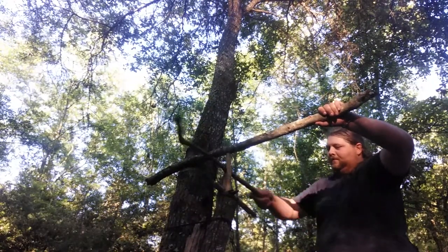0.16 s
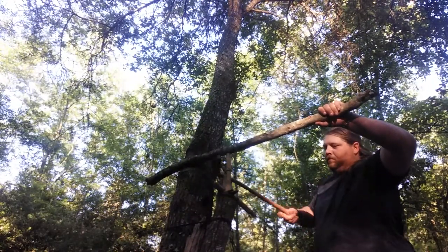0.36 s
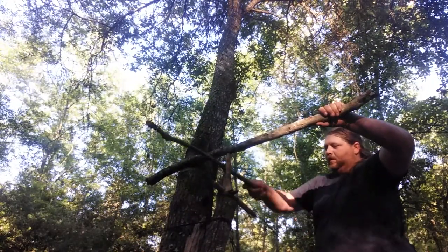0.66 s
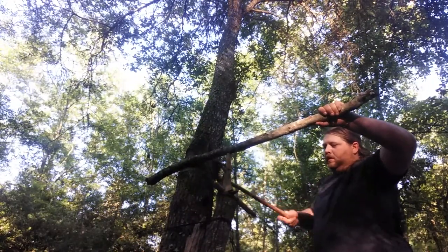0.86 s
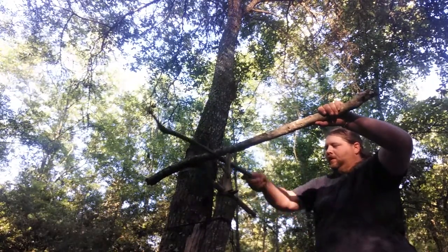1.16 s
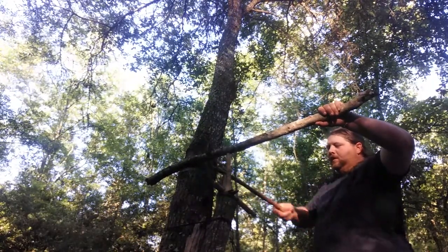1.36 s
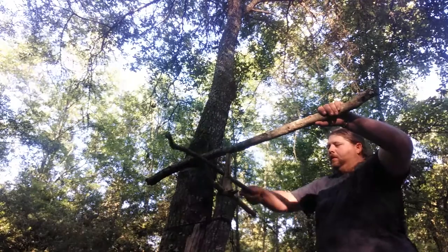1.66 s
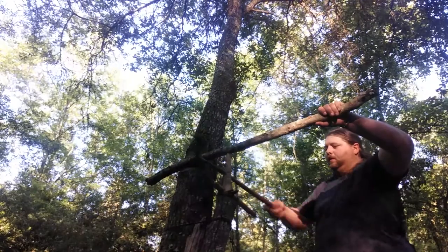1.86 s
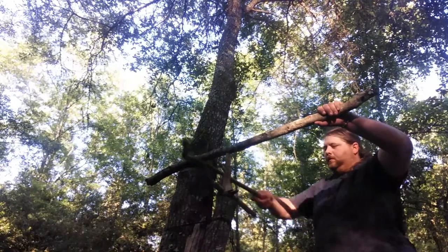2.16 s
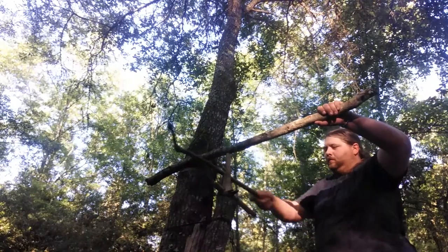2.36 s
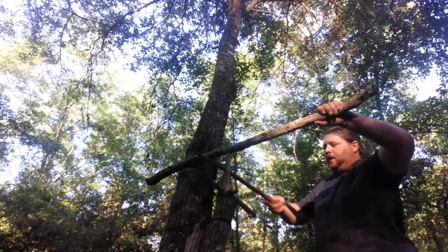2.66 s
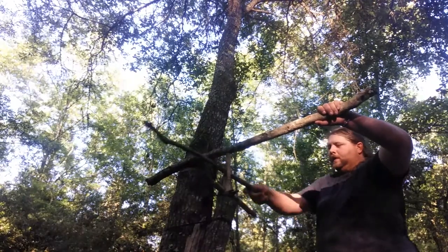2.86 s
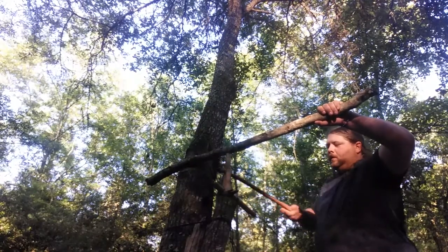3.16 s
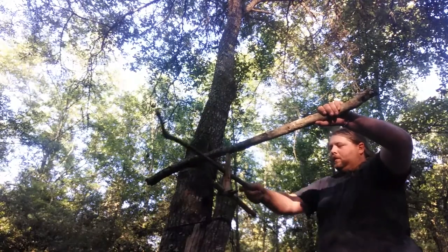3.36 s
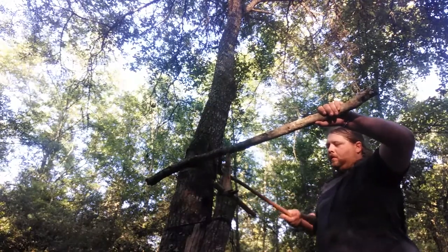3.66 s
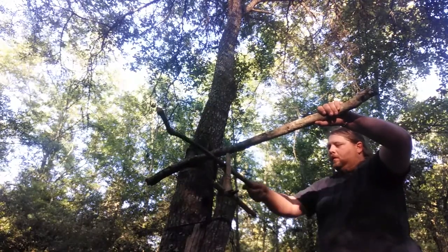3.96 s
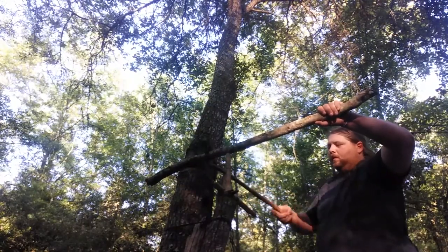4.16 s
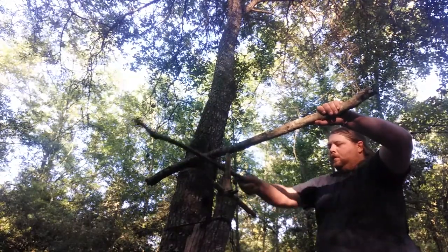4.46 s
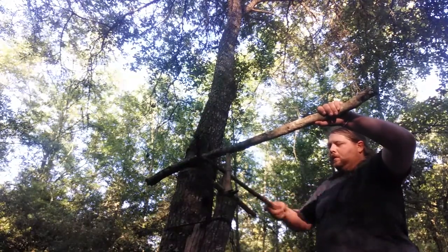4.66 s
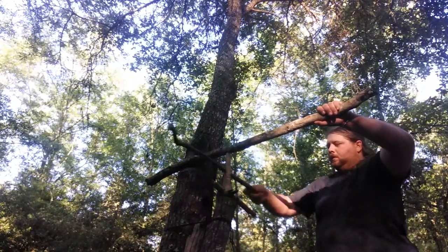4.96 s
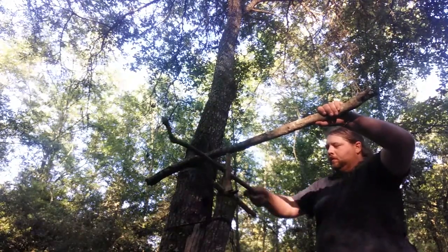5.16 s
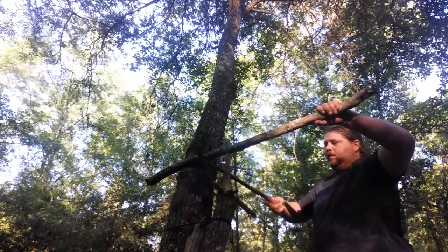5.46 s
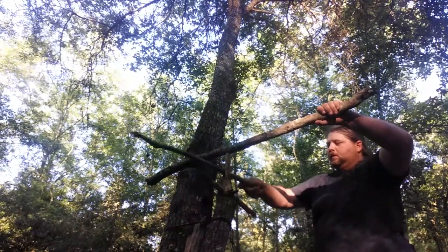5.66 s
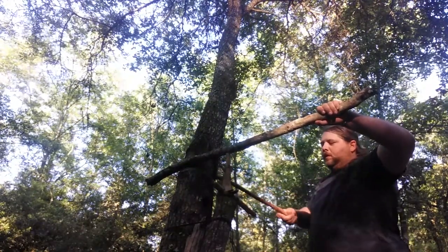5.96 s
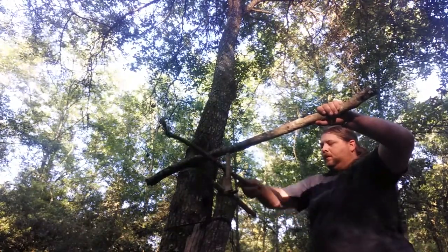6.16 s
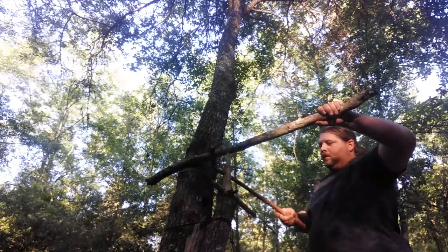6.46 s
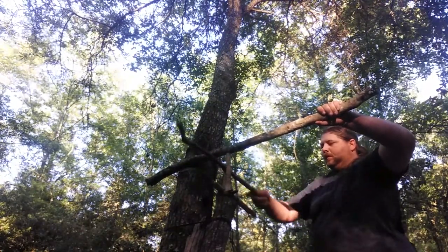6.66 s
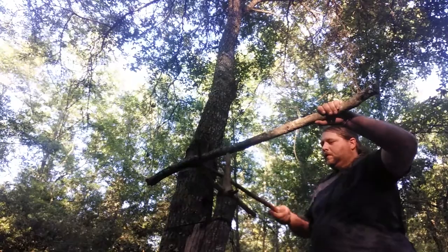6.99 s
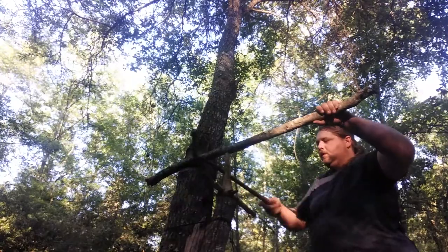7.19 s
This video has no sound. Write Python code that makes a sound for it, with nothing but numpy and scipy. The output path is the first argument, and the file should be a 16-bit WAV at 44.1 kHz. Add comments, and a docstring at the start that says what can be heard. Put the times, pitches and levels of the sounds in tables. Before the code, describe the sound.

From 0 to about 7.4 seconds a wooden bow drill is sawed outdoors, close by, over a faint low hush. The clip opens on the tail of a pull, with a chirp and small frame knocks; from 0.47 s pulls and pushes alternate, each lasting 0.12 to 0.22 s with short gaps, nearly two round trips a second. Pulls begin with a tiny groan, burst into a gritty clicking rasp and finish in a rising chirp near 2.8 kHz. Pushes squeal around 2.5 kHz, fluttering rapidly, rougher and screechier near 3 s, brighter later. Short yelps poke from the rasp near 1.0, 2.7, 3.2, 4.4, 4.9 and 5.5 s. Quick falling squeaks catch at 2.9, 5.0, 6.0 and 7.2 s; wooden knocks stand out at 2.75 and 6.2 s, with faint dull bumps at 4.7 and 5.8 s. Close scatter and a thin tree echo follow. It ends on another rasping pull and chirp.

```python
"""Over a low hush, the end of a wooden rasp and a chirp: a bow drill is sawed in a wood, about two round trips a second.
Stick-slip friction drives it all. On the push the spindle squeals, its pitch dipping once a turn;
on the pull it groans, breaks into a rasp of dense clicks, at times yelps, and ends in a rising chirp.
Around the turns of the bow come falling squeaks and knocks of the frame's modes; now and then a dull bump.
Dense random echoes give scatter close by and a faint tail from the trees."""
import sys
import numpy as np
from scipy import signal
from scipy.fft import rfft, irfft, next_fast_len
from scipy.io import wavfile
from scipy.ndimage import uniform_filter1d, minimum_filter1d, map_coordinates

SR = 44100
rng = np.random.default_rng(int(sys.argv[2]) if len(sys.argv) > 2 else 0)


def dump_mix(stems):
    """Bounce the given channels to the path in sys.argv[1] as a 16-bit WAV at rate SR."""
    frames = np.atleast_2d(stems).T  # one column per channel
    limited = np.clip(frames, -1, 1)  # hard clip at full scale
    pcm = np.round(limited * 32767).astype(np.int16)
    wavfile.write(sys.argv[1], SR, pcm)


N = 323238
SIDES = np.array([[1], [-1]])  # opposite sign in the two channels


def undb(db):
    """Logarithmic level: decibels to amplitude gain."""
    return 10 ** (np.asarray(db) / 20)


def unit(x):
    """Normalisation by mean power: scale to rms 1."""
    return x / np.sqrt(np.mean(x ** 2) + 1e-18)


def clock(start, end):
    """Discrete time: sample times of one event, with a margin of 1/20 s for its release."""
    return np.arange(int(max(start, 0) * SR), min(int(end * SR) + SR // 20, N)) / SR


def samples(t):
    """Discrete time: sample numbers of these times."""
    return np.round(t * SR).astype(int)


def add(track, t, x):
    """Superposition: mix an event into a track at its sample times."""
    first = int(round(t[0] * SR))
    track[first:first + len(t)] += x


def ramp(t, start, end, *values):
    """Linear interpolation through values spread evenly from start to end."""
    return np.interp(t, np.linspace(start, end, len(values)), values)


def gate(t, start, end, attack, release):
    """Amplitude envelope: a sine-squared rise from the start and fall centred on the end."""
    rise = np.clip((t - start) / attack, 0, 1)
    fall = np.clip((end - t) / release + .5, 0, 1)
    return np.sin(np.pi / 2 * rise * fall) ** 2


def walk(t, rate):
    """Band-limited chance: a smooth random curve, spread near 1, with rate new knots a second."""
    knots = rng.standard_normal(N // 8)
    place = (t - t[0]) * rate
    return map_coordinates(knots[:int(place[-1]) + 2], [place], order=2, mode="nearest")


def phase_of(hz):
    """Phase is the running integral of frequency."""
    return 2 * np.pi * np.cumsum(hz) / SR


def colour(x, points):
    """Minimum-phase filter, by the folded cepstrum, with the given (frequency [Hz], gain [dB])."""
    hz, db = np.transpose(points)
    size = next_fast_len(len(x) + SR // 10, real=True) * 2
    freq = np.maximum(np.arange(size // 2 + 1) * SR / size, 1)
    cepstrum = irfft(np.log(undb(np.interp(np.log(freq), np.log(hz), db))))
    # folding the negative times onto the positive makes the filter causal
    cepstrum[1:size // 2] *= 2
    cepstrum[size // 2 + 1:] = 0
    return irfft(rfft(x, size) * np.exp(rfft(cepstrum)))[:len(x)]


def resonance(x, hz, width_hz):
    """Simple resonance with gain 1 at its centre."""
    return signal.lfilter(*signal.iirpeak(hz, hz / width_hz, fs=SR), x)


def partials(phase, table):
    """Harmonic synthesis: sines at multiples of a phase."""
    return sum(undb(db) * np.sin(round(k) * phase) for k, db in table)


# spectrum of the hush of the wood: (frequency [Hz], gain [dB])
FOREST_SPECTRUM = [(30, -39.5), (90, 1), (170, -12.5), (400, -19.5), (15000, -30.5)]


def hush(t):
    """Filtered noise: a low, slowly wavering hush, mostly alike in both channels."""
    middle, side = (unit(colour(rng.standard_normal(N), FOREST_SPECTRUM)) for _ in range(2))
    return (middle + undb(-13.5) * SIDES * side) * undb(-51.5 + 2 * walk(t, 3.32))


SLIP_HZ = 545.5  # slips a second in the middle of a pull, for the main patch
SLIP_CLIMB = 0.32  # rise of the slip rate over a pull, as a share of its middle


def slip_speed(t):
    """Stick-slip rate follows sliding speed: it climbs through every pull and falls back before the next."""
    times = [s for start, end, *_ in PULL_STROKES for s in (start, end)]
    return 1 + SLIP_CLIMB * np.interp(t, times, np.tile([-.5, .5], len(PULL_STROKES)))


def slips(t, slip_hz):
    """Stick-slip as an impulse train: clicks of one rubbing patch, uneven in spacing and size."""
    rate = slip_hz * slip_speed(t) * np.exp(.04 * walk(t, 70) + .03 * walk(t, 900))
    turns = np.cumsum(rate) / SR
    at = np.flatnonzero(np.diff(np.floor(turns)))
    # each click is shared between two samples to place it in between
    late = turns[at + 1] % 1 * SR / rate[at + 1]
    size = undb(2 * rng.standard_normal(N)[:len(at)])
    clicks = np.zeros(N)
    clicks[at], clicks[at + 1] = size * late, size * (1 - late)
    return unit(clicks - clicks.mean())


SQUAWK_DB, DUST_DB = -2, -22  # squawks against the smeared clicks; dust hiss against the bare clicks
TRAVEL_S = 0.006  # travel time of bending waves at 1 kHz; longer at low pitch
# patches of the socket that rub at once: (slip rate [multiple of the main one])
PATCH_RATES = [1, 1.43, 2.17]
# response of the wood to the slips: (frequency [Hz], gain [dB])
WOOD_RESPONSE = [(150, -45), (300, -10), (500, -7.5), (1000, -4.5), (1200, -3.5), (1700, 11), (2300, 4),
                 (3470, -2.5), (4800, 0.5), (6040, -17.5), (7440, -1.5), (8690, -37), (10300, -17.5),
                 (15600, -31)]


def grind(t, squawk_hz=1300):
    """Stick-slip at several patches that take turns to lead; dispersion in the wood smears their clicks."""
    clicks = sum(slips(t, SLIP_HZ * ratio) * undb(6 * walk(t, 80)) for ratio in PATCH_RATES)
    clicks = unit(clicks) + undb(DUST_DB) * rng.standard_normal(N)  # fine hiss of wood dust
    freq = np.arange(N // 2 + 1) * SR / N
    dispersion = np.exp(-4j * np.pi * TRAVEL_S * np.sqrt(1000 * freq))
    smeared = irfft(rfft(clicks) * dispersion, N)
    # now and then the slips lock into a broken, gliding squawk
    pitch = squawk_hz * slip_speed(t) * np.exp(.05 * walk(t, 45) + .025 * walk(t, 700))
    locked = np.clip(walk(t, 100) + .5, 0, 1)
    squawk = partials(phase_of(pitch), GROAN_PARTIALS) * locked
    rasp = unit(colour(smeared, WOOD_RESPONSE)) + undb(SQUAWK_DB) * unit(squawk)
    chatter = undb(2 * walk(t, 300))
    # slow swings of power are evened out, leaving the quick chatter
    return unit(chatter * rasp / np.sqrt(uniform_filter1d(rasp ** 2, size=SR // 50)))


def rubbing(t, grit):
    """Resonance: one wood mode keeps sounding faintly, as the wood never quite rests between strokes."""
    return resonance(grit, 1560, 170) * undb(-46.5 + 2 * walk(t, 4.3))


GROAN_CLIMB_PER_S = 2.1  # climb of a groan's pitch each second, as a share of its first pitch
# partials of a groan, also of a squawk: (multiple of the pitch, level [dB])
GROAN_PARTIALS = [(1, 8), (2, 5.5), (3, -1), (4, -10)]


def groan(t, start, end, from_hz):
    """Slow stick-slip, far below the squeal's pitch, gliding up as the spindle gathers speed."""
    glide = 1 + GROAN_CLIMB_PER_S * (t - start)
    hz = from_hz * glide * (1 + .022 * walk(t, 700) + .025 * walk(t, 110))
    phase = phase_of(hz)
    note = sum(undb(db + 5 * walk(t, 153)) * np.sin(round(k) * phase) for k, db in GROAN_PARTIALS)
    return note * gate(t, start - .002, end, 0.012, 0.018)


# overtones of a squeal: (multiple of the pitch, level against the overtone setting [dB])
SQUEAL_OVERTONES = [(2, -1.5), (3, -5.5), (4, -17.5), (5, -21.5)]


def squeal(t, hz, growl_db, overtone_db, beat_db=-20, beat_hz=135, growl_hz=1150, upper_db=-9):
    """Fast stick-slip of wood on wood, with beats from a close lower mode and growling combination tones."""
    # under load the pitch grows ragged
    ragged = .012 + .025 * undb(growl_db)
    wander = ragged * walk(t, 1400) + (.012 + .012 * undb(beat_db)) * walk(t, 170)
    phase = phase_of(hz * (1 + wander))
    # the lower mode beats in amplitude and in phase
    beat = phase_of(beat_hz * np.exp(.3 * walk(t, 35)))
    rival = undb(beat_db + 4.1 * walk(t, 23.7))
    swing = (1 + rival * np.exp(-1j * beat)) / np.hypot(1, rival)
    phase = phase + np.angle(swing)
    top = undb(overtone_db + 4 * walk(t, 160)) * partials(phase, SQUEAL_OVERTONES)
    # a slower slip adds sum and difference tones
    slow = phase_of(np.minimum(growl_hz, hz / 2) * (1 + .035 * walk(t, 500)))
    sidebands = np.sin(phase - slow) + undb(upper_db) * np.sin(phase + slow) + top * np.sin(slow)
    growl = undb(growl_db + 3.9 * walk(t, 84.7)) * sidebands
    # the swing has a ceiling, so the level only drops out from it
    grip = undb(3.2 - 4 * np.hypot(.35, walk(t, 150)))
    return np.sqrt(2) * ((np.sin(phase) + top) * np.abs(swing) + growl) * grip


BIND_SHARPNESS, BIND_SKEW = 0.78, 0.427  # a bind builds slowly to its peak and lets go quickly


def binding(t, turn_rate, bind_s):
    """Periodic friction: binding near 1 once a turn and about -0.6 in between; the cord pulls unevenly."""
    angle = 2 * np.pi * turn_rate * (t - bind_s) + walk(t, 59.93) / 2
    skewed = angle + BIND_SKEW * (1 - np.cos(angle))
    peak = np.exp(BIND_SHARPNESS * (np.cos(skewed) - 1))
    return 2 * peak * (1 + 0.309 * walk(t, 29.95)) - 1


CREAK_DB = -17  # the slips' own low note, against the rasp
UNDER_GROAN_DB = -10.5  # change of the rasp's level while the groan lasts
SWELL_S = 0.035  # time in which the rasp takes over from the groan
FADE_DB_PER_S, FADE_LEAD_S = 204, 0.016  # the rasp dies away from just before the chirp locks
CHIRP_RISE_HZ_PER_S = 3500  # climb of the chirp up to the stroke's end; its release falls as fast
PULL_TURNS_PER_S, PULL_DIP_HZ = 19, 37.6  # the spindle binds once a turn in the chirp; dip at binding 1
# pull strokes: (start [s], end [s], length of the groan [s], its first pitch [Hz], groan level [dB],
#                rasp level [dB], length of the closing chirp [s], its top pitch before dips [Hz],
#                chirp level [dB])
PULL_STROKES = [(-0.07, 0.057, 0.0067, 696, -40, -22, 0.033, 2815, -22),
                (0.468, 0.611, 0.061, 1200, -28, -16.5, 0.024, 2810, -13.5),
                (0.986, 1.14, 0.013, 910, -27, -16, 0.049, 2700, -13),
                (1.532, 1.66, 0.068, 1146, -25.5, -10.5, 0.023, 2690, -13.5),
                (2.083, 2.234, 0.038, 1118, -22.5, -13, 0.069, 2803, -16),
                (2.617, 2.756, 0.025, 705, -23.5, -17, 0.011, 2670, -21.5),
                (3.181, 3.364, 0.048, 859, -27, -15, 0.037, 2834, -15),
                (3.726, 3.893, 0.026, 1111, -27, -18.5, 0.11, 2913, -13.5),
                (4.289, 4.468, 0.021, 1154, -33, -14, 0.025, 2775, -18),
                (4.845, 5.003, 0.026, 1130, -27.5, -27.5, 0.1172, 2924, -14.5),
                (5.436, 5.597, 0.041, 743, -28, -14.5, 0.027, 2903, -9.5),
                (6.021, 6.194, 0.038, 727, -25.5, -13, 0.026, 2640, -22),
                (6.562, 6.754, 0.036, 676, -32, -15, 0.038, 2822, -17.5),
                (7.239, 7.358, 0.034, 1206, -26, -16.5, 0.047, 2865, -17.5)]


def pulls(grit, chirp_growl_db=-21, chirp_overtone_db=-17):
    """Stick-slip regimes: a groan breaks into a rasp over a rising creak, then locks into a rising chirp."""
    out = np.zeros(N)
    for start, end, groan_s, groan_hz, groan_db, rasp_db, chirp_s, top_hz, chirp_db in PULL_STROKES:
        break_s, lock_s = start + groan_s, end - chirp_s
        t = clock(start - .005, end)
        add(out, t, undb(groan_db) * groan(t, start, break_s, groan_hz))

        # the creak levels off on the board's note
        creak_hz = SLIP_HZ * np.minimum(slip_speed(t), 1.025) * (1 + 0.049 * walk(t, 294.5))
        creak = np.sqrt(2) * np.sin(phase_of(creak_hz)) * undb(CREAK_DB + 2 * walk(t, 140.6))
        rasp = grit[samples(t)] + creak * gate(t, break_s - .01, end, 0.11, 0.0038)
        swell_db = ramp(t, break_s - SWELL_S / 2, break_s + SWELL_S / 2, UNDER_GROAN_DB, 0)
        fade_db = FADE_DB_PER_S * np.maximum(t - lock_s + FADE_LEAD_S, 0)
        rasp_gain = undb(rasp_db + swell_db - fade_db)
        add(out, t, rasp * rasp_gain * gate(t, start - .002, end, 0.02, 0.014))

        dip_hz = PULL_DIP_HZ * binding(t, PULL_TURNS_PER_S, lock_s)
        hz = top_hz - CHIRP_RISE_HZ_PER_S * np.abs(end - t) - dip_hz
        chirp = squeal(t, hz, chirp_growl_db, chirp_overtone_db)
        add(out, t, chirp * undb(chirp_db) * gate(t, lock_s - .002, end, 0.0089, 0.032))
    return out


def echoes(x, delay_s, t60):
    """Diffuse reverberation: dense random reflections start after a delay and decay exponentially."""
    age = np.arange(SR) / SR
    response = rng.standard_normal(SR) * undb(-60 * age / t60) * (age > delay_s)
    return signal.fftconvolve(x, response / np.linalg.norm(response))[:N]


# sideways scatter from the trunk and the ground: (frequency [Hz], level against the direct sound [dB])
SCATTER_SPECTRUM = [(1500, -12.5), (2600, -1.5), (4000, -6), (8000, -4.5), (13000, 5.5)]


def scatter(drill):
    """Early reflections: a short scatter of opposite sign in the two channels."""
    return SIDES * colour(echoes(drill, 0.00178, 0.025), SCATTER_SPECTRUM)


def trees(drill):
    """Late reverberation: a faint coloured tail, independent in the two channels."""
    far = colour(drill, [(1900, -3.5), (2650, 6.0), (3500, 4), (12000, -5.0)])
    return undb(-17.5) * np.array([echoes(far, 0.0104, 0.44) for _ in range(2)])


# nominal gap between the bounces of a knock, and level of each bounce against the one before
BOUNCE_S, BOUNCE_DB = 0.013, -10.5
# modes of the frame: (frequency [Hz], level [dB], t60 [s]), each detuned and reweighted at every bounce
FRAME_MODES = [(743, 5.5, 0.041), (980, -2, 0.023), (1506, 5, 0.023)]
# the frame shifts in its lashing: (time [s], level [dB])
FRAME_KNOCKS = [(0.061, -24), (0.203, -28.5), (0.625, -24.5), (1.159, -25), (1.269, -21.5), (1.476, -30),
                (1.698, -26.5), (1.746, -30), (2.255, -26), (2.754, -18), (3.363, -23), (3.9, -25.5),
                (3.982, -39), (5.599, -25), (6.178, -18), (6.265, -30), (7.141, -34)]


def knocks(crack_db=-2, crack_s=0.0068, low_hz=300, dull_hz=1900):
    """Modal impact: fading bounces, each on another spot, give a dull crack and the frame's short modes."""
    out = np.zeros(N)
    band = signal.butter(2, [low_hz, dull_hz], "bandpass", fs=SR)
    scuff = unit(signal.lfilter(*band, rng.standard_normal(N)))
    for start, db in FRAME_KNOCKS:
        gaps = BOUNCE_S * rng.uniform(0.507, 1.4, size=3)
        for bounce, at in enumerate(start + np.cumsum(gaps) - gaps[0]):
            t = clock(at, at)
            age = t - t[0]
            # spread of the tuning (share) and of the level (dB) from spot to spot
            spots = rng.standard_normal((len(FRAME_MODES), 2)) * [.07, 2.5]
            ring = np.zeros(len(t))
            for (hz, mode_db, t60), (detune, spot_db) in zip(FRAME_MODES, spots):
                decay = undb(mode_db + spot_db - 60 * age / t60)
                ring += decay * np.sin(2 * np.pi * hz * (1 + detune) * age)
            crack = undb(crack_db) * np.exp(-age / crack_s) * scuff[samples(t)]
            onset = 1 - np.exp(-age / 0.0008)
            add(out, t, undb(db + BOUNCE_DB * bounce) * (ring + crack) * onset)
    return out


SAG_HZ = 374  # pitch lost when the load is 0 dB
EASE_DB = 17  # away from the hard pressure the load is this much weaker
GROWL_LIMIT_DB = -3.5  # the growl setting stays under the squeal
ENTRY_HZ = 90  # a push starts this much higher, before the hand bears down
SPIN_UP_S = 0.0434  # the once-a-turn dips build up as the spindle gets going
STROKE_ARCH_DB = 5.5  # the bow is slower, and the squeal softer, at both ends; loss half a travel from the peak
OVERTONE_DB, BRIGHTEN_DB_PER_S = -16.5, 1.23  # the squeal's overtones grow from stroke to stroke
# push strokes: (start [s], end [s], unloaded pitch [Hz], level before the arch [dB],
#                level slope [dB per unit of travel], hardest bind [s], 1/e half-width of that pressure [s],
#                load there [dB], spindle rate [turns/s], pitch dip at binding 1 [Hz], beating mode [dB])
PUSH_STROKES = [(0.752, 0.913, 2673, -13.5, -3.5, 0.888, 0.13, -27, 33.8, 164, -8),
                (1.322, 1.453, 2609, -13, 1.5, 1.337, 0.055, -15.5, 28, 88, -16),
                (1.841, 1.997, 2642, -12.5, -5, 1.877, 0.028, -15.5, 24.7, 138.5, -10.5),
                (2.412, 2.528, 2483, -13.5, 11, 2.506, 0.028, -7, 26.5, 55.7, -5.5),
                (2.928, 3.104, 2528, -14.5, 2, 2.967, 0.05, 1, 19.7, 127, -6.5),
                (3.476, 3.647, 2576, -11.5, 7, 3.508, 0.074, -5.5, 24.6, 148.5, -9),
                (4.058, 4.222, 2660, -14.5, -2, 4.181, 0.02, -37, 20, 74, -1.5),
                (4.546, 4.761, 2611, -12, 4, 4.645, 0.067, -12.5, 23, 69.5, -2.5),
                (5.15, 5.36, 2593, -13.5, 0, 5.189, 0.049, -18, 22.3, 86, -9.5),
                (5.748, 5.967, 2627, -13.5, -6.5, 5.866, 0.098, -12, 24.5, 144.7, -7.5),
                (6.276, 6.493, 2601, -12.5, 0.5, 6.42, 0.083, -6.5, 23, 191, -6.5),
                (6.885, 7.075, 2577, -18, -16.5, 6.903, 0.13, -11.5, 23.2, 77.6, -8)]


def pushes(grit, entry_s=0.0269, bite_db=9, grit_db=-10):
    """Load-dependent stick-slip: as the spindle binds the pitch sags, the growl swells and the note screeches."""
    out = np.zeros(N)
    for (start, end, free_hz, db, slope_db, bind_s, press_s,
         hardest_db, turn_rate, dip_hz, beat_db) in PUSH_STROKES:
        t = clock(start - .01, end)
        travel = ramp(t, start, end, -0.37, 0.3)
        bind = binding(t, turn_rate, bind_s) * ramp(t, start, start + SPIN_UP_S, 0, 1)
        pressure = np.exp(-((t - bind_s) / press_s) ** 2)
        load_db = hardest_db - EASE_DB * (1 - pressure)
        entry_hz = ENTRY_HZ * np.exp(-(t - start) / entry_s)
        hz = free_hz - SAG_HZ * undb(load_db) - dip_hz * bind + entry_hz
        growl_db = np.minimum(load_db + bite_db * bind, GROWL_LIMIT_DB)
        overtone_db = OVERTONE_DB + BRIGHTEN_DB_PER_S * start
        note = squeal(t, hz, growl_db, overtone_db, beat_db)
        sound = note + undb(growl_db + grit_db) * grit[samples(t)]
        sound = sound / np.hypot(1, undb(growl_db))  # the growl draws its strength from the note
        level_db = db + slope_db * travel - STROKE_ARCH_DB * (2 * travel) ** 2
        add(out, t, sound * undb(level_db) * gate(t, start - .007, end, 0.032, 0.05))
    return out


YELP_S, YELP_CLIMB = 0.021, 0.038  # full width at 1/e, and the share by which the pitch climbs over it
# the spindle locks for a moment onto its own low note: (middle [s], pitch [Hz], level [dB])
YELP_NOTES = [(1.018, 1183, -12.5), (2.666, 1176, -13), (3.231, 1170, -14.5), (4.358, 1172, -13),
              (4.908, 1554, -13), (4.944, 1654, -14.5), (5.045, 1190, -18.5), (5.508, 1150, -14.5)]


def yelps(octave_db=-8, third_db=-17):
    """Mode locking: brief, nearly pure notes under a Gaussian envelope stand out of the rasp."""
    out = np.zeros(N)
    for middle, hz, db in YELP_NOTES:
        start, end = middle - YELP_S / 2, middle + YELP_S / 2
        t = clock(start - .01, end)
        pitch = hz * (1 + YELP_CLIMB * ramp(t, start, end, -.5, .5) + .02 * walk(t, 500))
        note = partials(phase_of(pitch), [(1, 0), (2, octave_db), (3, third_db)])
        envelope = np.exp(-(2 * (t - middle) / YELP_S) ** 2)
        add(out, t, np.sqrt(2) * undb(db) * note * envelope)
    return out


SQUEAK_FALL_HZ_PER_S = 9200  # stretched by about a twentieth in the ramp below
# short falling squeaks as the bow turns round: (start [s], length [s], middle pitch [Hz], level [dB])
TURN_SQUEAKS = [(1.296, 0.021, 1550, -28.5), (2.93, 0.019, 2076, -12.5), (5.013, 0.033, 2670, -17),
                (6.011, 0.0092, 2216, -12), (7.193, 0.015, 2560, -21), (7.234, 0.007, 2473, -6.5)]


def squeaks(growl_db=-16, overtone_db=-17):
    """Stick-slip near rest: the spindle catches briefly and its pitch falls."""
    out = np.zeros(N)
    for start, length, hz, db in TURN_SQUEAKS:
        end = start + length
        t = clock(start - .005, end)
        fall_hz = SQUEAK_FALL_HZ_PER_S * length * ramp(t, start, end, -0.517, 0.536)
        note = squeal(t, hz - fall_hz, growl_db, overtone_db)
        add(out, t, note * undb(db) * gate(t, start - .002, end, 0.0061, 0.0053))
    return out


# dull bumps: (time [s], level [dB])
DULL_BUMPS = [(4.692, -28), (5.839, -32)]


def bumps(low_hz=70, drop_hz=400, fall_s=0.005, decay_s=0.026):
    """Damped oscillation: soft low thuds whose pitch falls quickly."""
    out = np.zeros(N)
    for start, db in DULL_BUMPS:
        t = clock(start, start + .06)
        age = t - t[0]
        hz = low_hz + drop_hz * np.exp(-age / fall_s)
        add(out, t, undb(db) * np.sin(phase_of(hz)) * np.exp(-age / decay_s))
    return out


def scene():
    """Superposition of the drill close by, its echoes, and the low hush of the wood."""
    t = np.arange(N) / SR
    grit = grind(t)
    strokes = pulls(grit) + pushes(grit) + rubbing(t, grit)
    drill = strokes + knocks() + yelps() + squeaks() + bumps()
    return drill + scatter(drill) + trees(drill) + hush(t)


TOP_HZ = 15800  # upper edge of the sound


def record(dry):
    """Peak limiting and low-pass filtering: peaks are held at full scale, then the top is cut."""
    needed = 1 / np.maximum(np.abs(dry).max(axis=0), 1)
    gain = uniform_filter1d(minimum_filter1d(needed, size=200), size=200)
    low_pass = signal.ellip(10, .2, 80, TOP_HZ, fs=SR, output="sos")
    return signal.sosfilt(low_pass, dry * gain)


dry = scene()
out = record(dry)
dump_mix(out)
```